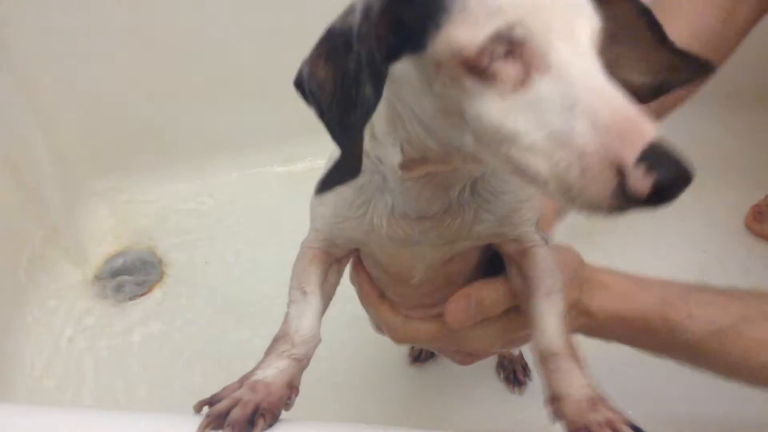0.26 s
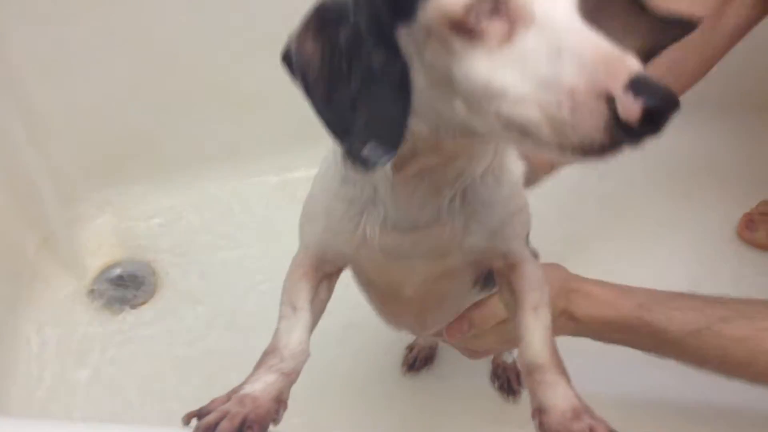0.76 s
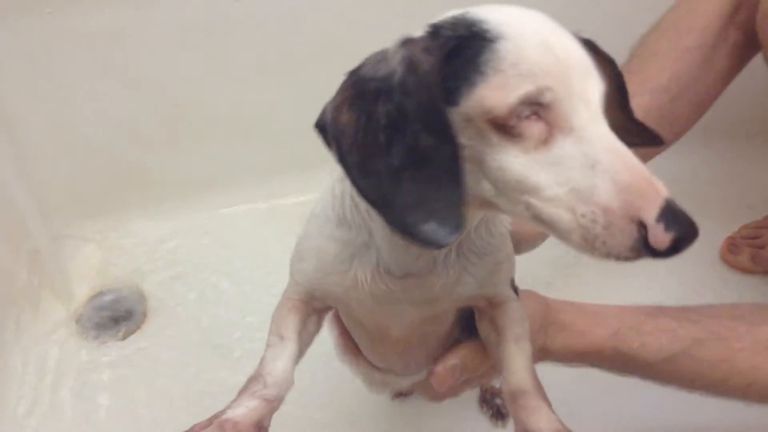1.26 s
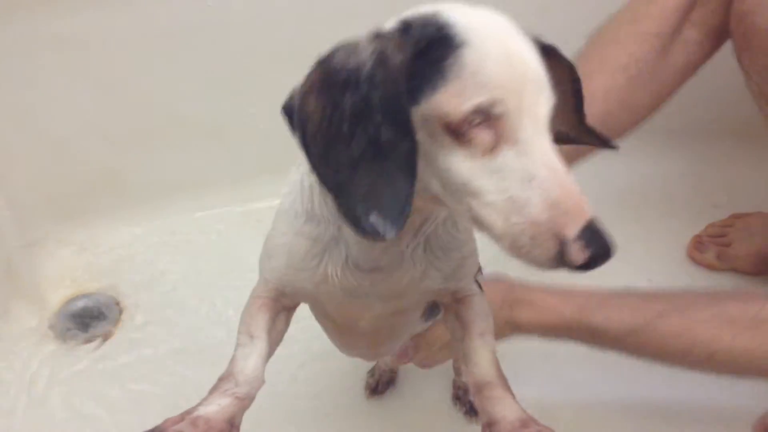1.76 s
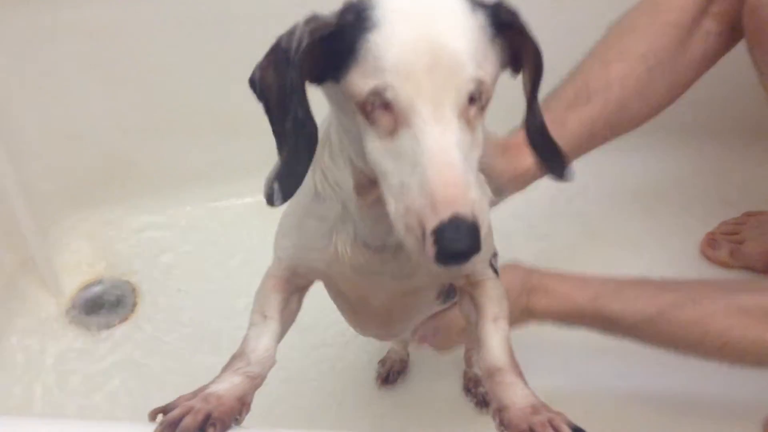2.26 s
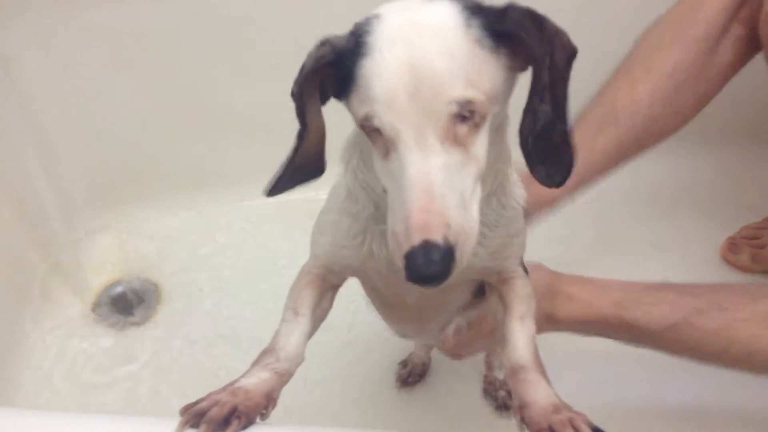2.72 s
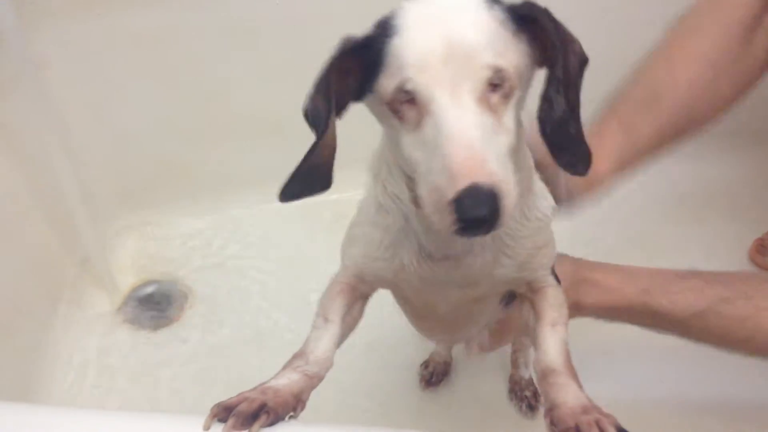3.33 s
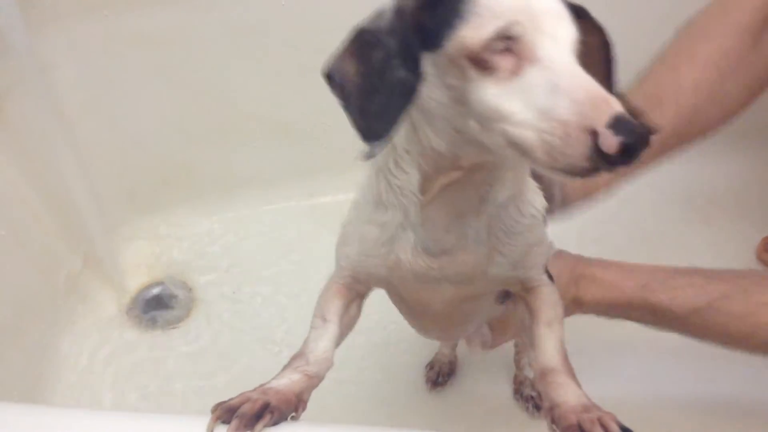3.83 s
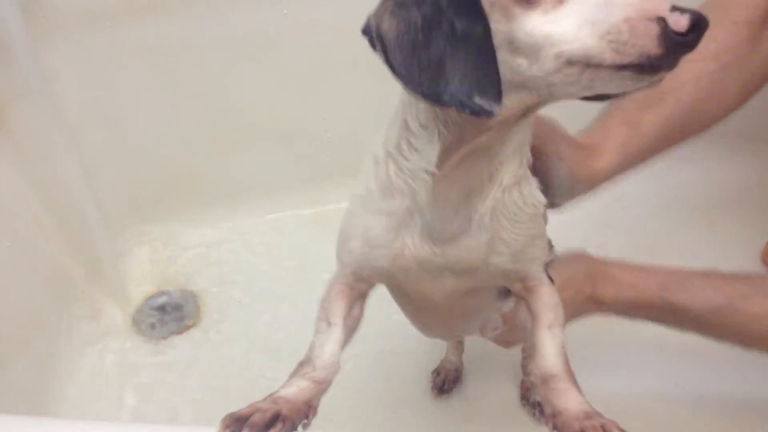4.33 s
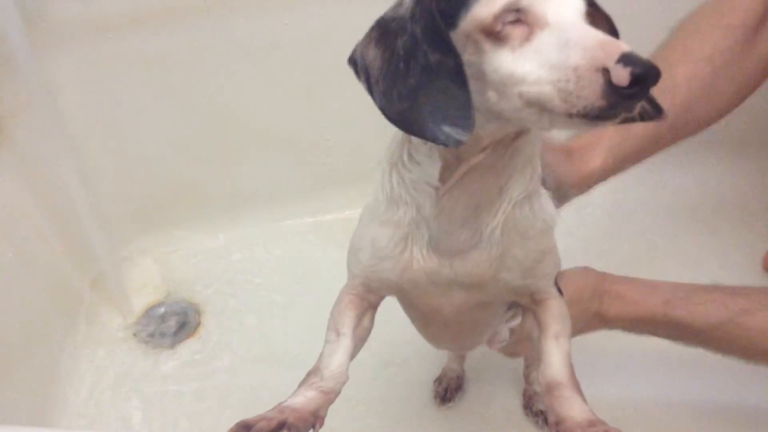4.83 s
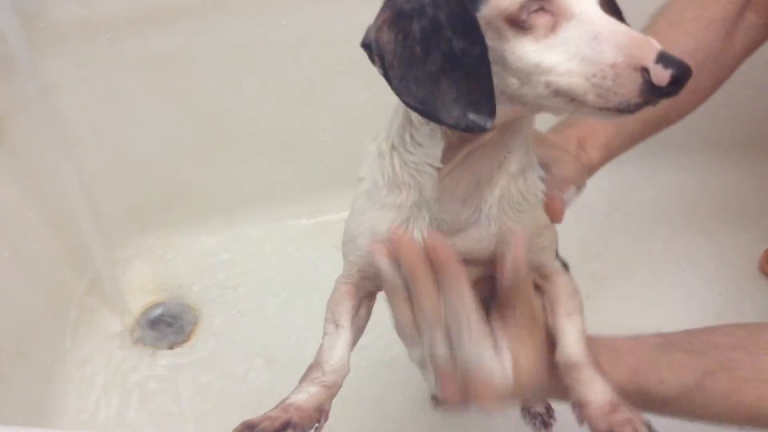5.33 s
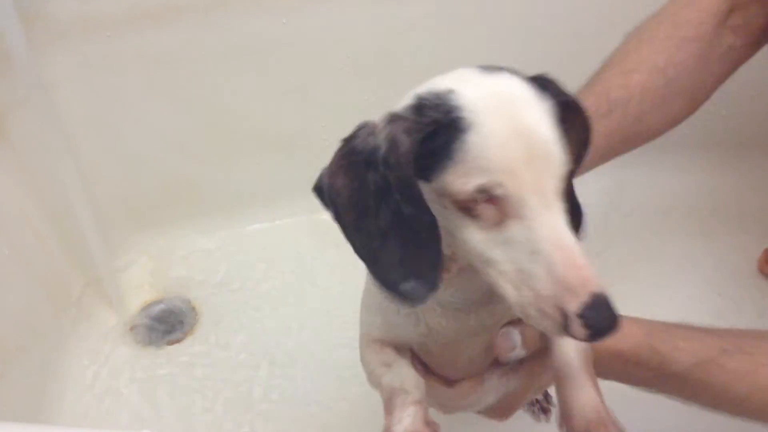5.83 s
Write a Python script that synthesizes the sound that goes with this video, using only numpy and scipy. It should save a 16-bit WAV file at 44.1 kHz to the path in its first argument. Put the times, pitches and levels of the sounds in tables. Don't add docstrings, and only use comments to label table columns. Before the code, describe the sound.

Close, bright splashing of running water on a hard tub floor, full of ticks, plops and glugs, over a very faint fan hum.

```python
import sys
import numpy as np
from scipy import signal
from scipy.fft import rfft, irfft, next_fast_len
from scipy.io import wavfile
from scipy.ndimage import uniform_filter1d

SR = 44100
rng = np.random.default_rng(int(sys.argv[2]) if len(sys.argv) > 2 else 0)


def to_linear_factor(level_db):
    exponent = np.asarray(level_db, float) / 20
    return 10 ** exponent


def pcm_store(signal):
    levels = np.round(np.clip(np.atleast_2d(signal), -1, 1) * 32767)
    wavfile.write(sys.argv[1], SR, levels.astype(np.int16).T)


N = 268128

# (time [s], peak level [dB], pitch [Hz])
HEAVY_DROPS = [(0.179, -10, 5750), (0.4926, -5, 4420), (0.5881, -12, 6000), (0.838, -11, 6230),
               (1.296, -12, 5180), (1.442, -11, 6240), (1.4676, -11, 5170), (1.6965, -7, 5170),
               (1.7445, -18, 6240), (1.8364, -9, 4800), (1.8647, -8, 4670), (1.9685, -11, 4550),
               (2.1011, -14, 4710), (2.1824, -24, 5670), (2.2348, -8.5, 4000), (2.2822, -9, 5250),
               (2.3176, -22, 4050), (2.383, -14, 5190), (2.4518, -16, 6600), (2.6153, -4.5, 7180),
               (2.651, -8, 5750), (2.7072, -7, 5300), (2.7384, -8, 4700), (2.799, -11, 5300),
               (2.819, -10, 4820), (2.8684, -7, 6360), (2.9123, -11, 4220), (2.986, -9, 5160),
               (3.0066, -7, 4520), (3.1078, -11, 5400), (3.1532, -14, 6210), (3.19, -9, 6800),
               (3.238, -12, 4560), (3.4516, -8.5, 4960), (3.5194, -15, 5140), (3.547, -10, 6690),
               (3.7284, -9, 5180), (3.807, -15, 5570), (3.8467, -8, 5440), (3.9578, -9, 5600),
               (4.0053, -19, 6090), (4.0297, -11, 4100), (4.0876, -8, 6520), (4.1929, -7, 6370),
               (4.2268, -11, 6230), (4.5106, -5, 5160), (4.6069, -27, 5470), (4.762, -5, 6560),
               (4.841, -10, 4600), (4.9287, -10, 4950), (5.0534, -9, 6240), (5.1108, -27, 5470),
               (5.182, -16, 5710), (5.3303, -10, 5300), (5.5019, -7, 7000), (5.5657, -7, 6240),
               (5.6366, -18, 4700), (5.7084, -12, 7640), (5.7503, -11, 5750), (5.9633, -8, 5800)]


def curve(rows):
    s, values = np.transpose(rows)
    return np.interp(np.arange(N) / SR, s, values)


def at_hz(points, hz):
    points_hz, points_db = np.transpose(points)
    return np.interp(np.log(hz), np.log(points_hz), points_db)


def rms_one(x):
    return x / np.sqrt(np.mean(x ** 2) + 1e-20)


def drift(rate_hz):
    r = np.exp(-80 * np.pi * rate_hz / SR)
    noise = rng.standard_normal(N // 40 + 2002)
    slow = signal.lfilter([1], [1, -2 * r, r * r], noise)[2000:]
    return np.interp(np.arange(N) / 40, np.arange(len(slow)), rms_one(slow))


def resonate(x, hz, width_hz):
    r = np.exp(-np.pi * width_hz / SR)
    poles = [1, -2 * r * np.cos(2 * np.pi * hz / SR), r * r]
    return signal.lfilter([(1 - r * r) / 2, 0, (r * r - 1) / 2], poles, x)


def decay(kicks, fade_s):
    return signal.lfilter([1], [1, -np.exp(-1 / (fade_s * SR))], kicks)


def swells(times_s, lifts_db, rise_s, fall_s):
    t = np.arange(0, N + 160, 160) / SR
    since = t[:, None] - np.asarray(times_s)
    shape = np.exp(-np.where(since < 0, since / rise_s, since / fall_s) ** 2)
    return np.interp(np.arange(N) / SR, t, shape @ np.asarray(lifts_db))


def drops(per_s, spread_db, clump_db):
    sizes = to_linear_factor(spread_db * np.minimum(rng.exponential(1, N), 4)) * rng.choice([-1, 1], N)
    lands = rng.random(N) < per_s * to_linear_factor(clump_db * drift(15)) / SR
    return rms_one(sizes * lands)


def hits(events, trim_db=0):
    s, peak_db, _ = np.transpose(events)
    out = np.zeros(N)
    out[np.round(s * SR).astype(int)] = to_linear_factor(peak_db + trim_db)
    return out


def pops(events, cycles, rise, trim_db):
    out = np.zeros(N + SR)
    for s, peak_db, hz in events:
        turns = np.arange(int(40 * SR / hz)) * hz / SR
        shape = (1 - np.exp(-turns / 3.6)) * to_linear_factor(-60 * turns / cycles)
        tone = np.sin(2 * np.pi * turns * (1 + rise * turns / cycles))
        start = round(s * SR)
        out[start:start + len(turns)] += to_linear_factor(peak_db + trim_db) * tone * shape / shape.max()
    return out[:N]


def spit(events, low_hz, high_hz, fade_s, trim_db):
    fading = decay(hits(events, trim_db), fade_s) * rng.standard_normal(N)
    band = signal.butter(2, [low_hz, high_hz], "band", fs=SR, output="sos")
    return signal.sosfilt(band, fading)


def level_swing_db():
    # (time [s], level [dB])
    shared_level = [(0.0, -19.5), (0.56, -19), (0.68, -21.5), (1.32, -18.5), (2.45, -19), (2.49, -20.5),
                    (2.64, -20.5), (2.93, -20), (2.96, -20.5), (3.0, -20), (3.08, -22.5), (4.08, -19.5),
                    (4.13, -23), (4.23, -21), (4.25, -23), (4.74, -20.5), (5.69, -18.5), (6.08, -19.5)]
    db = curve(shared_level)
    return db - db.mean()


def puddle_db():
    # (time [s], level [dB])
    depth = [(0, 0.5), (0.5, -1), (0.7, -1), (1.3, -2), (1.6, -2), (2.1, 1.5), (2.5, -1), (2.95, 1),
             (3.03, -3), (3.38, 0), (3.75, 1.5), (4.3, 0), (4.6, -0.5), (5.0, -1), (5.5, 0.5), (6.08, 1)]
    return curve(depth)


def fan():
    # (frequency [Hz], density [dB per Hz])
    floor_spectrum = [(13, -73), (22, -43), (64, -23), (104, -14.5), (151, -9), (227, -4), (256, 2.5),
                      (358, -5), (420, -5), (550, -60), (920, -120)]
    hz = np.maximum(np.fft.rfftfreq(N, 1 / SR), 1)
    rumble = irfft(rfft(rng.standard_normal(N)) * to_linear_factor(at_hz(floor_spectrum, hz)), N)
    hum = np.sqrt(2) * np.sin(2 * np.pi * 125 * np.arange(N) / SR) * to_linear_factor(2.8 * drift(3.7))
    return to_linear_factor(-50 + 0.98 * level_swing_db()) * rms_one(rumble) + to_linear_factor(-69.5) * hum


def surge_db(hz):
    # (time [s], lift or dip [dB], pitch [Hz])
    surges_and_lulls = [(0.01, 8, 690), (0.19, 1, 5000), (0.27, 4, 3100), (0.3, 6, 3200), (0.33, 1.5, 3300),
                        (2.68, 0, 3300), (2.24, 0.5, 4970), (2.39, 4.5, 5000), (4.04, 4, 2500), (4.06, 1.5, 4200),
                        (0.5, 7, 900), (0.51, 1.5, 5000), (0.59, 1.5, 5000), (0.79, -3, 3000), (1.07, 4, 5000),
                        (1.34, 1.5, 2980), (1.51, 0, 700), (1.6, 2, 9900), (1.69, 0, 1390), (2.11, 3, 1800),
                        (2.32, 4, 4500), (2.64, 6.5, 1200), (2.71, 2, 2600), (2.81, -1, 2500), (2.9, 2.5, 6000),
                        (3.26, 3, 6000), (3.55, -2, 5000), (3.76, 5.5, 2930), (3.86, 3, 8000), (4.0, -6, 2500),
                        (4.19, 5, 3000), (4.62, 6, 8000), (4.85, 3, 4530), (5.01, -1, 800), (5.14, 6, 1970),
                        (5.19, 6.5, 8000), (5.56, -3, 4000),
                        (0.37, -3, 2000), (0.7, -3, 2000), (1.12, -4, 2530), (1.6, -5, 1780), (1.86, -7, 7160),
             (2.59, 0, 2000), (2.77, 1, 7000), (3.19, -9, 2500), (3.32, -8, 2980), (3.7, -4, 6000),
             (3.92, 2, 6000), (4.57, -7, 2250), (5.07, -2, 4070), (5.8, 0, 7000), (4.66, -3, 6000),
             (5.65, -0.5, 4300), (1.22, -2, 3000), (1.46, 1, 1500), (2.2, -9, 1500), (4.39, -4, 3000)]
    s, lift_db, pitch_hz = np.transpose(np.array(surges_and_lulls))
    octaves = np.log2(pitch_hz / hz)
    return swells(s, lift_db * np.exp(-(octaves / 0.62) ** 2), rise_s=0.012, fall_s=0.025)


def bubbles(low_hz, high_hz, per_s, cycles, spread_db, hiss, crackle, count=14):
    # (frequency [Hz], density [dB per Hz])
    water_colour = [(180, -45), (300, -39), (438, -16.5), (476, -15.5), (580, -5.5), (780, -6.5),
                    (1070, -6.5), (1340, -7), (1560, -10), (1780, -10.5), (2240, -8), (5630, 1),
                    (11800, 5.5), (13700, -1.5), (15400, -35)]
    born = drops(per_s, spread_db, clump_db=1.5)
    dealt = rng.integers(0, count, N)
    white = rng.standard_normal((2, N))
    out = 0
    for k in range(count):
        hz = low_hz * (high_hz / low_hz) ** ((k + .5) / count)
        drive = np.sqrt(count) * born * (dealt == k) + hiss * white[k % 2] + crackle * (-1) ** k
        rung = resonate(resonate(drive, hz, 2.2 * hz / cycles), hz, .9 * hz)
        patches_db = 1.94 * drift(33.0) + 1.68 * drift(2.7)
        out = out + to_linear_factor(at_hz(water_colour, hz) + surge_db(hz) + patches_db) * rung
    return rms_one(out)


def spurts(per_s, fade_s):
    kicks = np.minimum(rng.exponential(1, N), 1.8) * (rng.random(N) < per_s / SR)
    swell = uniform_filter1d(decay(kicks, fade_s), size=40)
    return rms_one(swell - swell.mean())


def jet():
    level_swing, puddle = level_swing_db(), puddle_db()
    crackle = drops(2500, 3.9, clump_db=2.6)
    flare = decay(hits(HEAVY_DROPS), fade_s=0.0055)

    gurgle = bubbles(369.0, 1388, 500, 28.7, 2.46, 0.93, 0.19 * crackle, count=20)
    splash = bubbles(1413, 3270, 900, 13.7, 2.6, 0.75, 0.22 * crackle)
    fizz = bubbles(3540, 6380, 1800, 7.1, 0.8, 0.55, 0.61 * crackle)
    spray = bubbles(6760, 15050, 4000, 13.7, 4.2, 0.93, 0.5 * crackle)

    water = to_linear_factor(-37.5 + 0.96 * level_swing + puddle) * gurgle
    water += to_linear_factor(-30 + 0.47 * level_swing + 0.25 * puddle) * (1 + 0.96 * flare) * splash
    water += to_linear_factor(-21 + level_swing) * (1 + 2.0 * flare) * fizz
    water += to_linear_factor(-24 + level_swing) * (1 + 1.4 * flare) * spray
    return to_linear_factor(0.74 * spurts(36, 0.0079)) * water


def shell():
    # (frequency [Hz], width [Hz], level [dB])
    shell_modes = [
        (221.2, 19.6, 10.5),
        (235, 60, 8),
        (320.3, 7.8, 7.5),
    ]
    # (time [s], lift [dB])
    thumps = [(0.36, 3), (0.65, 11), (0.95, 0), (1.2, 7), (1.3, 0), (1.5, 7), (1.71, 4), (1.85, 0),
              (1.97, 2), (2.14, 0), (2.41, 12), (2.6, 9.5), (2.93, 0), (3.76, 5), (3.93, -4), (4.1, 10),
              (4.21, 10), (4.35, 12), (4.76, 9), (5.05, 11), (5.17, 6), (5.91, 10)]
    pounding = drops(900, spread_db=2.5, clump_db=2.0)
    ring = 0
    for hz, width_hz, db in shell_modes:
        ring = ring + to_linear_factor(db) * resonate(resonate(pounding, hz, width_hz), hz, 2 * width_hz)
    thump_db = swells(*np.transpose(thumps), rise_s=0.048, fall_s=0.053)
    return to_linear_factor(-51.5 + 0.71 * level_swing_db() + 0.81 * puddle_db() + thump_db) * rms_one(ring)


def glugs():
    # (time [s], peak level [dB], pitch [Hz])
    pockets = [(0.061, -12.5, 1020), (0.116, -14, 1370), (0.452, -13, 597), (0.497, -5, 1200),
               (1.103, -14.5, 1050), (1.246, -19, 676), (1.398, -17, 1100), (1.503, -12.5, 604),
               (1.505, -11.5, 512), (1.671, -10, 704), (1.912, -13, 1260), (2.052, -12, 572),
               (2.634, -12.5, 665), (2.712, -8.5, 1200), (3.192, -17, 1040), (4.078, -12, 1000),
               (4.418, -15, 654), (4.44, -28, 675), (0.612, -16.5, 606), (4.704, -15, 1060), (5, -7, 1150),
               (5.127, -13, 1370), (5.205, -14, 1050), (4.998, -11.5, 610), (5.44, -9, 1070),
               (5.485, -16, 740), (5.556, -23, 720), (5.799, -17, 840)]
    late_s = rng.uniform(0.00776, 0.073, len(pockets))
    detune = rng.uniform(1.0, 1.07, len(pockets))
    partners = [(s + late, db, hz * d) for (s, db, hz), late, d in zip(pockets, late_s, detune)]
    return pops(pockets, 21.3, 0.077, -13.5) + pops(partners, 28, 0.034, -22)


def drain():
    # (time [s], lift of first mode [dB], lift of second mode [dB])
    gulp_lifts = [(0.09, 18, 20), (0.29, 8, -5), (0.4, 8, -7), (0.87, 8, 0), (1.27, -3, 14), (1.53, -4, -1),
                  (1.67, -9, 29), (1.8, 18, 22), (2.12, 12, 7), (2.3, -13, 20), (2.55, 23, 22),
                  (2.66, 24, 5), (2.82, 21, 8), (2.99, 15, 21), (3.4, 24, 19), (3.6, 21, 9), (3.77, 19, 27),
                  (3.9, 20, 3), (4.02, 15, 29), (4.2, 18, -3), (4.44, 21, 3), (4.86, 15.5, 20),
                  (5.15, 23, 6), (5.24, 10, -8), (5.35, 20, -8), (5.63, 19, 24), (5.67, 8, 21),
                  (5.72, 11, 25), (0.43, 5, 0), (5.53, 9, 7), (5.82, 13, 6), (3.5, 10, 0), (3.7, 6, 2),
                  (5.78, 23, 14), (5.86, 19, 9), (5.95, 23, -1)]
    first_hz, second_hz = 1578, 2230
    s, *lifts_db = np.transpose(gulp_lifts)
    first_db, second_db = [level_swing_db() + swells(s, 0.91 * db, rise_s=0.015, fall_s=0.031) for db in lifts_db]

    wavering_hz = first_hz + 13 * drift(40)
    first = np.sin(2 * np.pi * np.cumsum(wavering_hz) / SR) * to_linear_factor(3.5 * drift(45))
    gulps = drops(3000, spread_db=1.5, clump_db=1.0)
    second = rms_one(resonate(resonate(gulps, second_hz, 260), second_hz, 400))
    return to_linear_factor(-48.5 + first_db) * first + to_linear_factor(-53.5 + second_db) * second


def ticks():
    # (time [s], peak level [dB], pitch [Hz])
    fine_drops = [(0.0967, -7, 9480), (0.2194, -11, 9380), (0.4599, -12, 10100), (0.4943, -11, 9480),
                  (0.5482, -10, 8520), (0.693, -4, 11300), (0.9203, -15, 10100), (0.9877, -12, 13400),
                  (1.0515, -10, 10000), (1.1403, -11, 10200), (1.256, -7, 9480), (1.3818, -13, 10700),
                  (1.4895, -17, 10400), (1.5648, -8, 9370), (1.6382, -10, 9450), (1.925, -14, 9630),
                  (1.9969, -13, 8520), (2.0986, -16, 10000), (2.164, -3, 11900), (2.1949, -9, 10600),
                  (2.2333, -8, 10900), (2.2837, -12, 12500), (2.3416, -10, 8710), (2.3655, -9, 11400),
                  (2.4987, -17, 10600), (2.5282, -3, 11400), (2.5985, -11, 10700), (2.9033, -3, 11800),
                  (2.9871, -9, 9190), (3.0819, -13, 11100), (3.1901, -16, 12200), (3.2675, -11, 10800),
                  (3.3712, -3, 12800), (3.4341, -14, 11400), (3.5179, -9, 8550), (3.5478, -12, 12200),
                  (3.5952, -9, 8840), (3.7269, -12, 9830), (3.8496, -13, 8850), (3.9065, -7, 10100),
                  (3.9325, -12, 9780), (4.0053, -13, 9310), (4.0577, -13, 11400), (4.1934, -12, 11600),
                  (4.5226, -8, 10100), (4.6239, -12, 8760), (4.7027, -12, 8630), (4.7611, -18, 9060),
                  (4.8214, -13, 10800), (4.9886, -13, 10100), (5.1816, -11, 12300), (5.2579, -6, 10600),
                  (5.439, -10, 10100), (5.4695, -6, 9590), (5.4969, -12, 9420), (5.5657, -10, 8900),
                  (5.6176, 0, 10300), (5.6825, -7, 10100), (5.709, -3, 9120), (5.9623, -8, 9930)]
    return pops(fine_drops, 17.0, .03, -1.3)


def plops():
    # (time [s], peak level [dB], pitch [Hz])
    clear_bubbles = [(0.1067, -8, 3720), (0.2014, -11, 3730), (0.2738, -11, 2940), (0.2937, -13, 3180),
                     (0.4404, -7, 3620), (0.5482, -15, 3630), (0.6504, -20, 3820), (0.7577, -24, 3710),
                     (0.7896, -11, 2950), (0.9193, -14, 3070), (0.9547, -11, 2790), (1.1797, -9, 3630),
                     (1.2451, -30, 3460), (1.2965, -22, 3650), (1.4346, -7, 2730), (1.5254, -9.5, 2700),
                     (1.5628, -22, 3060), (1.6671, -16, 2750), (1.725, -10, 3100), (1.7619, -3, 2880),
                     (1.9659, -23, 3150), (1.9944, -11, 2560), (2.0502, -10, 2680), (2.1021, -12, 2850),
                     (2.1226, -6, 2980), (2.1415, -11, 3170), (2.1685, -12, 3170), (2.2069, -17, 3160),
                     (2.2323, -16, 3710), (2.2633, -10, 2780), (2.2802, -8, 3150), (2.3725, -9, 3140),
                     (2.4324, -11, 2560), (2.4508, -5, 3080), (2.5292, -7, 3310), (2.6938, -6.5, 2680),
                     (2.8195, -18, 3600), (2.8679, -13, 3580), (2.9153, -11, 2180), (2.9791, -18, 2190),
                     (3.0031, -9, 3490), (3.3348, -16, 2700), (3.3912, -10.5, 3140), (3.6576, -26, 3000),
                     (3.7663, -10, 2140), (3.9749, -7, 3210), (4.0272, -12, 3630), (4.1759, -11, 3020),
                     (4.4742, -15, 3260), (4.7032, -15, 2440), (4.8404, -20, 3210), (5.0649, -16, 3580),
                     (5.0814, -9.5, 2670), (5.1307, -21, 2150), (5.2684, -13, 2830), (5.5672, -5, 3100),
                     (5.6521, -20, 2260), (5.7224, -15, 2290), (5.8451, -14, 2680), (5.9304, -9, 2930),
                     (0.277, -9, 3400),
        (0.309, -15, 3300),
        (0.296, -14, 2120),
        (0.413, -16, 1600),
        (2.694, -8, 3300),
        (2.711, -11, 2900),
        (4.177, -15, 2540),
        (5.62, -16, 2200),
        (5.69, -12, 2280),
        (5.74, -14, 2250),
    ]
    events = np.array(clear_bubbles)
    return pops(events, 11, 0.091, -5.5) + spit(events, 1850, 4600, 0.0099, -5)


def slaps():
    return spit(HEAVY_DROPS, 2000, 14400, 0.0053, -10.5) + pops(HEAVY_DROPS, 36, 0.058, -4.5)


def bathroom(x):
    size = next_fast_len(N + SR)
    hz = np.fft.rfftfreq(size, 1 / SR)
    t60_s = .17 / (1 + hz / 9000)
    response = 0
    for k, lag_s in enumerate(rng.uniform(.009, .04, 20)):
        echo = to_linear_factor(-60 * lag_s / t60_s) * np.exp(-2j * np.pi * hz * lag_s)
        response = response + (-1) ** k * echo / (1 - echo)
    wet = irfft(rfft(x, size) * response, size)[:N]
    return wet * np.std(x) / np.std(wet)


def tub(x):
    hollow_hz = [485, 595, 862, 1044, 1428, 1585, 1706, 1905, 1971, 2158, 2275, 2375, 2455, 2558, 2680,
                 3069, 3167, 3266]
    # (width [Hz], lift or dip [dB])
    hollow_lifts = [(20, 8), (60, 2), (24, 3.5), (22, 5), (40, 2.5), (50, 3.5), (36, 3), (38, 4), (37, 3),
                    (45, 4), (50, 5), (35, -8), (45, 3), (41, 1), (60, 4), (45, 2.5), (53, 2), (37, 1)]
    for hz, (width_hz, lift_db) in zip(hollow_hz, hollow_lifts):
        x = x + (to_linear_factor(lift_db) - 1) * resonate(x, hz, width_hz)
    return x * to_linear_factor(-2.5)


def scene():
    water = jet() + glugs() + ticks() + plops() + slaps()
    heard = tub(water * to_linear_factor(1.25) + to_linear_factor(-10.5) * bathroom(water))
    return (fan() + heard + shell() + drain())[None]


def low_pass(x):
    return signal.sosfilt(signal.butter(12, 15330, fs=SR, output="sos"), x)


def record(dry):
    limited = 0.9 * np.tanh(dry / 0.95)
    mix = signal.sosfilt(signal.butter(2, 90, "high", fs=SR, output="sos"), limited)
    mix = signal.sosfilt(signal.butter(4, 14800, fs=SR, output="sos"), mix)
    return low_pass(mix)


dry = scene()
out = record(dry)
pcm_store(out)
```